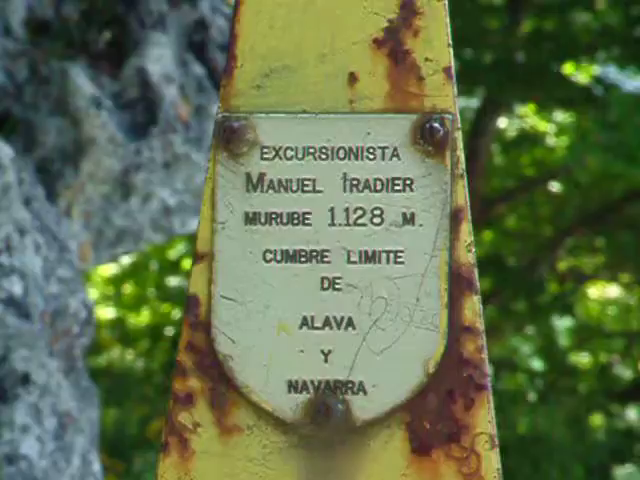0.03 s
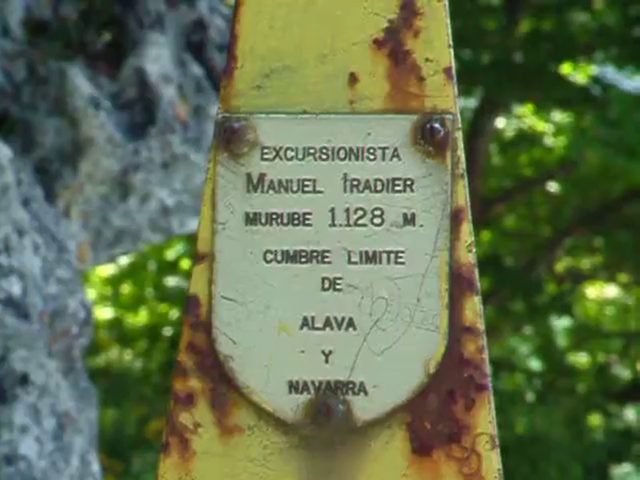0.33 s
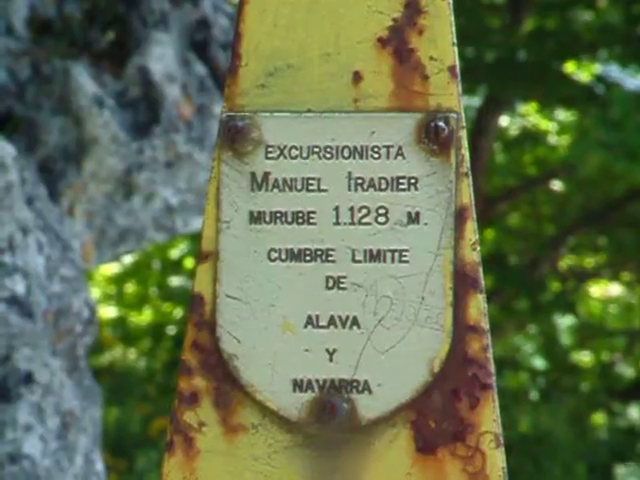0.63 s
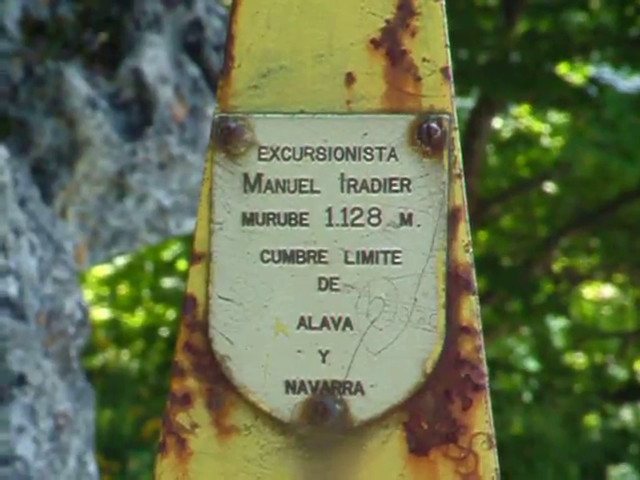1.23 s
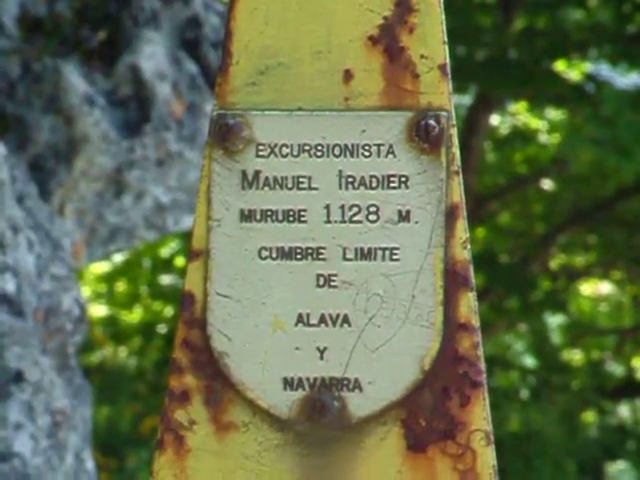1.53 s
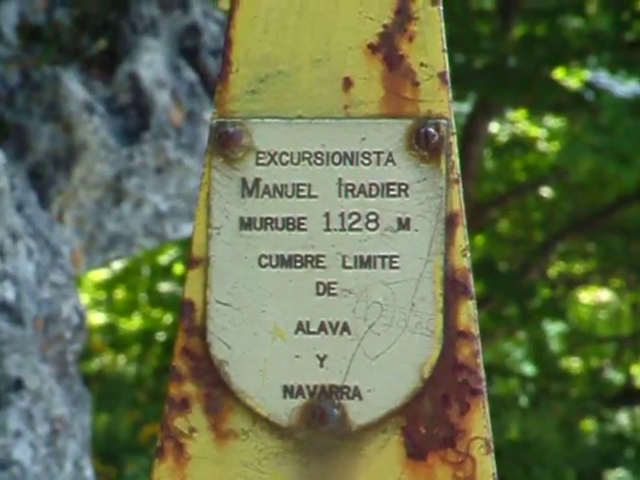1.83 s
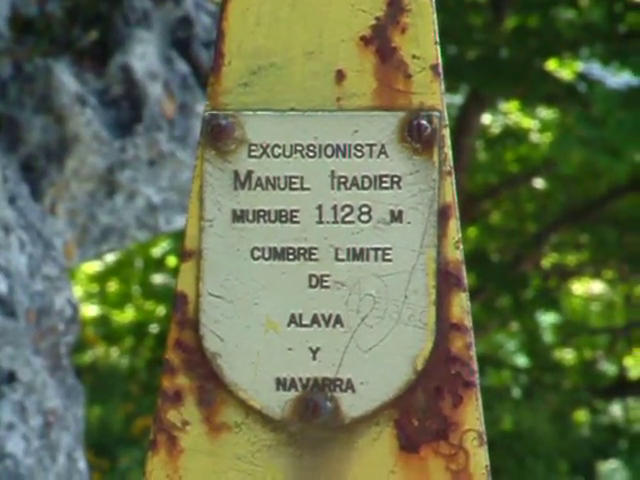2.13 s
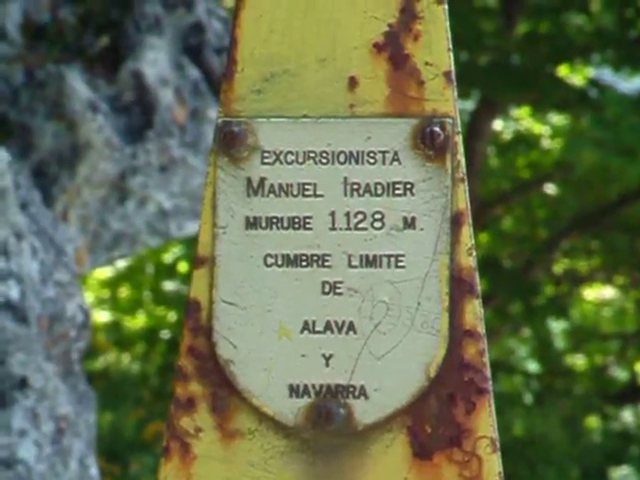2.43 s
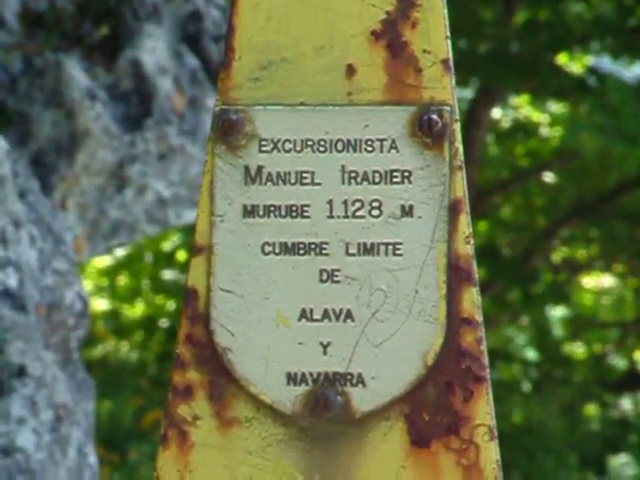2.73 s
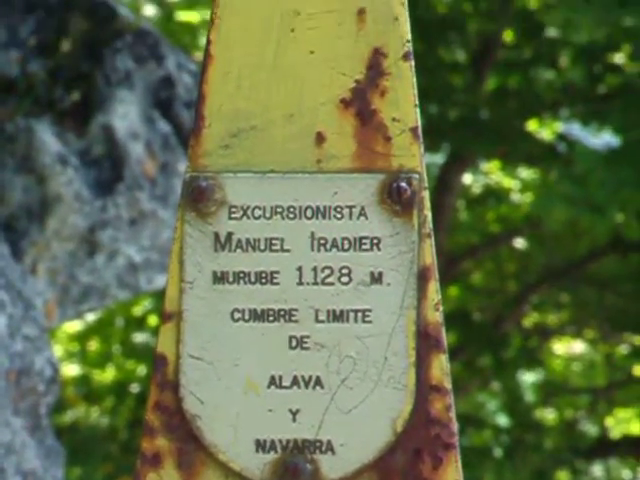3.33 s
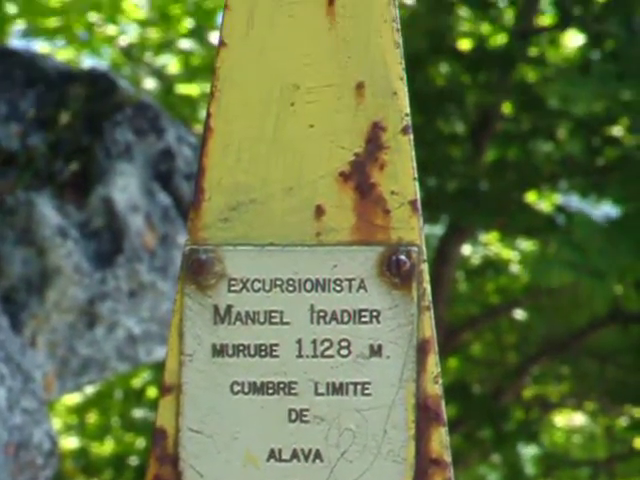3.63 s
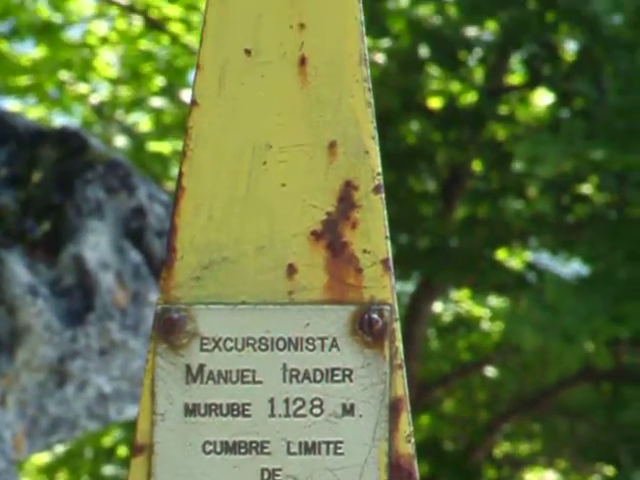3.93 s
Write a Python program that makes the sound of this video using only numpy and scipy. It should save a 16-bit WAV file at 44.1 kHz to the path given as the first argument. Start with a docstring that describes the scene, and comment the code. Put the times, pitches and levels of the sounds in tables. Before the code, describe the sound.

A steady, soft hiss with faint, high electronic whines starts on a sharp finger tap at about 0.1 seconds and runs throughout. Fingers touch the camera body right at the microphone: a faint scuff at 2 seconds, two crisp clicks near 2.4 and 2.6, a small knock at 3, another scuff at 3.4, and soft, dull taps at 3.7 and 3.9. The surroundings are quiet.

```python
"""A sharp finger tap, right at the microphone, and a steady hiss sets in: a small camera in a quiet wood.
Almost all that is heard is its own noise, amplifier hiss and thin electronic whines.
Fingers tap and scuff the case a few times, ringing its well-damped modes.
Everything passes through a coarse, slow converter."""
import sys
import numpy as np
from scipy import signal
from scipy.fft import rfft, irfft
from scipy.io import wavfile

SR = 44100
rng = np.random.default_rng(int(sys.argv[2]) if len(sys.argv) > 2 else 0)


def transcribe(u):
    """Save the signal u as a 16-bit wav file named by the first command-line argument.

    u: samples, shape (n,) or (channels, n), limited to [-1, 1]; the rate is SR.
    q: integer samples, one column per channel.
    """
    v = np.clip(np.atleast_2d(u).T, -1, 1)
    q = np.round(v * 32767).astype(np.int16)
    wavfile.write(sys.argv[1], SR, q)


N = 176400

# spectrum of the microphone amplifier's hiss (frequency [Hz], relative density [dB])
HISS_SPECTRUM = [(20, -9), (40, -9.5), (70, -3), (140, -0.5), (280, -1), (550, -4), (1000, -5.5),
                 (1600, -7.5), (2800, -9), (5500, -10.5), (8000, -10)]
# steady whines of the electronics (frequency [Hz], rms level [dB])
WHINE_TONES = [(1276, -63.5), (1653, -74.5), (3273, -68.5), (3456, -69.5), (3548, -68), (4355, -79),
               (4452, -76), (4549, -76.5), (4727, -71.5), (4823, -73), (5006, -72.5), (5448, -73),
               (5728, -72), (6724, -67), (6821, -71), (7004, -60), (7725, -75.5)]
# modes of the camera case (frequency [Hz], relative level [dB], time to fall 60 dB [s])
CASE_MODES = [(169.5, -1.5, 0.034), (282.3, 1.5, 0.029), (440, 5.5, 0.0081), (790, -1.5, 0.013),
              (1435, -4, .012), (1782, 3, 0.0062), (2230, -12.5, 0.016), (2680, -8, 0.0028),
              (3450, -16.5, 0.0077), (5090, -4, 0.0038), (5700, 1.5, 0.0033), (7100, -7, 0.0016)]
# where a tap's thud, knock, ring, snap and tick drive the modes (frequency [Hz])
TAP_ZONES_HZ = [175, 350, 1700, 2650, 5500]
# finger taps and their drive in each zone
# (time [s], low cut [Hz], thud [dB], knock [dB], ring [dB], snap [dB], tick [dB])
FINGER_TAPS = [ (0.0727, 654, -60, -44.5, -31.5, -43, -47), (0.0787, 1190, -74, -42, -27.5, -22.5, -32),
               (0.0798, 1840, -70, -65, -33, -25, -30), (2.3685, 248, -41.5, -28.5, -33, -32, -26),
               (2.5635, 1340, -75, -68, -24.5, -34.5, -25.5), (3.0433, 236, -50, -31, -44, -46, -38),
               (3.7205, 320, -67, -37, -54, -66, -61), (3.9342, 120, -33.5, -45.5, -70, -66, -69), ]
# scuffs of skin on the case (middle [s], half length [s], level [dB], low edge [Hz], high edge [Hz])
SKIN_SCUFFS = [ (0.0822, 0.0022, -37, 1010, 5930), (2.0, 0.0058, -43.5, 340, 1214),
               (3.4364, 0.0044, -41, 380, 2700), ]

HISS_RMS_DB = -48.5
WANDER_RMS_HZ, WANDER_RATE_HZ = 1.2, 6
SCUFF_RING_DB, SCUFF_TILT_DB_PER_OCTAVE = 8, -2  # ring: the case against the bare friction
CONVERTER_START_S, CONVERTER_HZ = .0722, 16000
CONVERTER_STEP, CONVERTER_OFFSET = .0055, .0043  # full scale is 1
SMOOTH_HZ, BAND_LIMIT_HZ = 7850, 9300


def hiss():
    """Even noise from the microphone amplifier, a little stronger in the low mids."""
    hz, db = np.transpose(HISS_SPECTRUM)
    return gain_of(HISS_RMS_DB) * noise(lambda f: gain_of(np.interp(np.log(f + 1), np.log(hz), db)))


def whines():
    """Thin steady tones from the electronics, whose pitch wanders very slightly."""
    out = np.zeros(N)
    for hz, db in WHINE_TONES:
        wander_hz = WANDER_RMS_HZ * noise(lambda f: 1 / (1 + (f / WANDER_RATE_HZ) ** 2))
        phase = 2 * np.pi * np.cumsum(hz + wander_hz) / SR
        out += np.sqrt(2) * gain_of(db) * np.sin(phase)
    return out


def tap(low_cut_hz, zone_db):
    """One finger blow on the case, by the microphone; each has its own low cut, dull thud to thin click."""
    mode_hz = [mode[0] for mode in CASE_MODES]
    drives_db = np.interp(np.log(mode_hz), np.log(TAP_ZONES_HZ), zone_db)
    low_cut = signal.butter(3, low_cut_hz, "highpass", fs=SR, output="sos")
    return signal.sosfilt(low_cut, case_ring(drives_db))


def case_ring(drives_db):
    """The well-damped modes of the case, each driven by its own amount."""
    t = np.arange(SR // 10) / SR
    return sum(gain_of(db + drive_db) * np.exp(-np.log(1000) * t / t60) * np.sin(2 * np.pi * hz * t)
               for (hz, db, t60), drive_db in zip(CASE_MODES, drives_db))


def scuff(middle_s, half_s, db, low_hz, high_hz):
    """A few milliseconds of close skin friction that swell and fade, coloured by the case."""
    t = np.arange(N) / SR
    swell = np.exp(-.5 * np.minimum(((t - middle_s) / half_s) ** 2, 100))
    hz = np.fft.rfftfreq(N, 1 / SR)
    resonances = sum(1 / (1 + ((hz - mode_hz) * np.pi * 2 * t60 / np.log(1000)) ** 2)
                     for mode_hz, _, t60 in CASE_MODES)
    band = 1 / np.sqrt((1 + (low_hz / (hz + 1)) ** 10) * (1 + (hz / high_hz) ** 12))
    tilt = gain_of(SCUFF_TILT_DB_PER_OCTAVE * np.log2(hz + 1))
    rub = swell * noise(lambda _: band * tilt * (1 + gain_of(SCUFF_RING_DB) * resonances))
    return gain_of(db) * rub * np.linalg.norm(swell) / np.linalg.norm(rub)


def noise(shape):
    """Noise of rms 1 whose spectrum follows shape(Hz)."""
    white = rfft(rng.standard_normal(N))
    shaped = irfft(white * shape(np.fft.rfftfreq(N, 1 / SR)), N)
    return shaped / np.sqrt(np.mean(shaped ** 2) + 1e-20)


def gain_of(db):
    """Decibels to gain."""
    return 10 ** (np.asarray(db) / 20)


def add(mix, start_s, sound):
    """Mixes a sound in at a time."""
    part = mix[max(round(start_s * SR), 0):][:len(sound)]
    part += sound[:len(part)]


def scene():
    """One microphone channel: the camera's own noise and the fingers on its case."""
    out = hiss() + whines()
    for start_s, low_cut_hz, *zone_db in FINGER_TAPS:
        add(out, start_s, tap(low_cut_hz, zone_db))
    for row in SKIN_SCUFFS:
        out += scuff(*row)
    return out[None]


def record(dry):
    """The converter switches on and rounds to coarse steps; then smoothing and the band limit."""
    slow = signal.resample(dry, N * CONVERTER_HZ // SR, axis=1)
    running = np.arange(slow.shape[1]) / CONVERTER_HZ >= CONVERTER_START_S
    stepped = CONVERTER_STEP * np.round((slow + CONVERTER_OFFSET) / CONVERTER_STEP) * running
    upsample = 441  # SR / CONVERTER_HZ = 441 / 160
    smoothing = signal.firwin(28 * upsample + 1, SMOOTH_HZ, window=("kaiser", 9),
                              fs=CONVERTER_HZ * upsample)
    smoothed = signal.resample_poly(stepped, SR, CONVERTER_HZ, axis=1, window=smoothing)[:, :N]
    band_limit = signal.firwin(511, BAND_LIMIT_HZ, window=("kaiser", 9), fs=SR)
    return signal.oaconvolve(smoothed, band_limit[None], "same")


dry = scene()
out = record(dry)
transcribe(out)
```